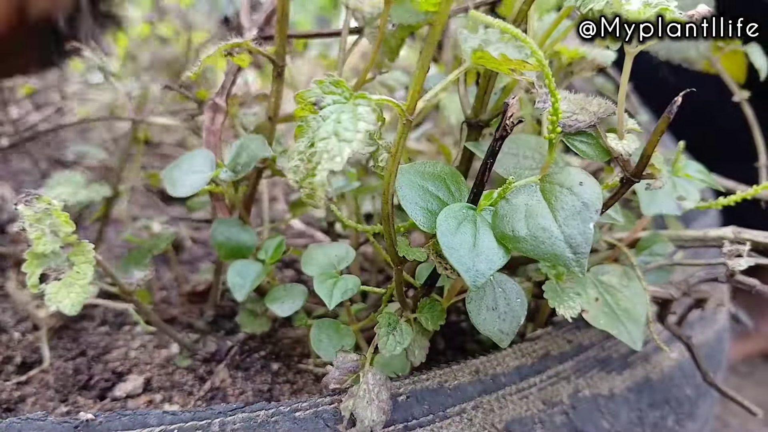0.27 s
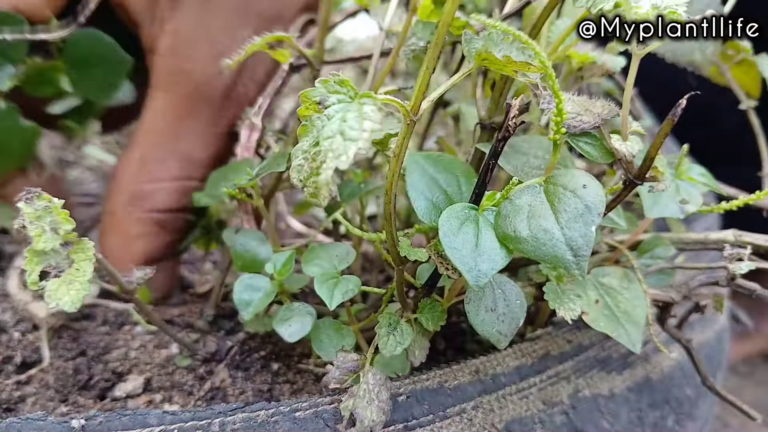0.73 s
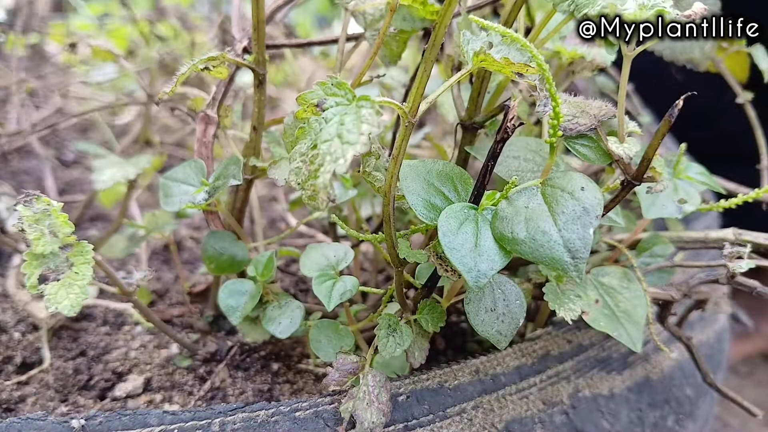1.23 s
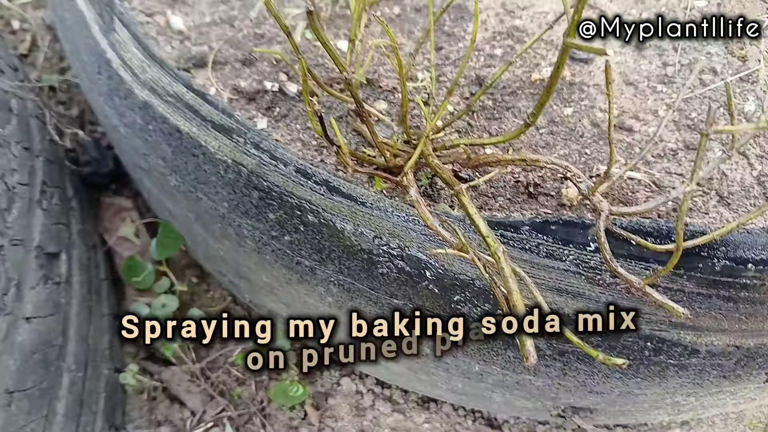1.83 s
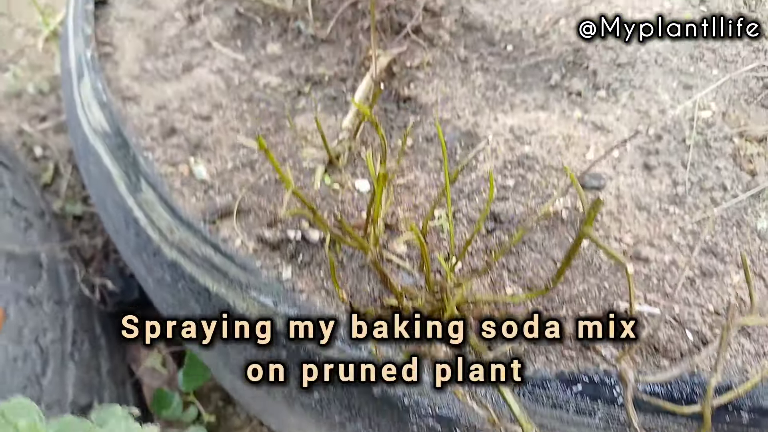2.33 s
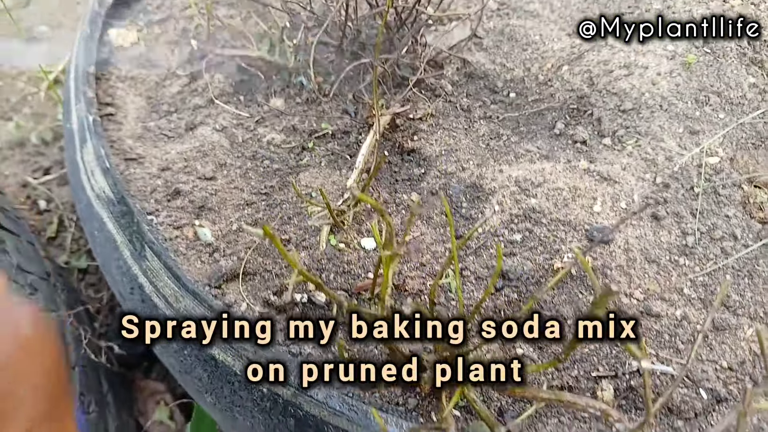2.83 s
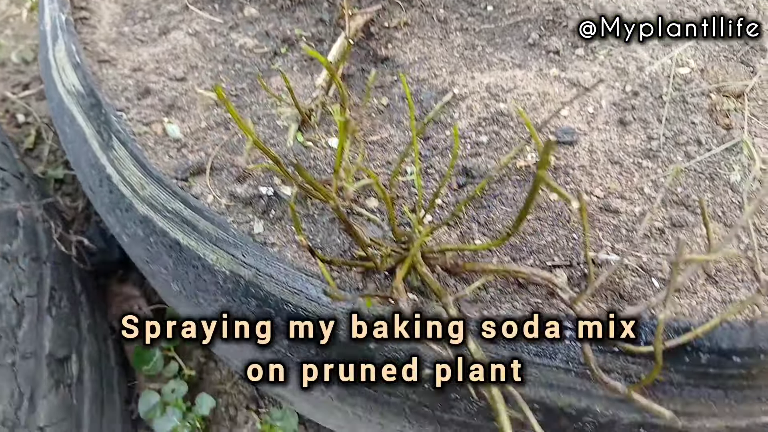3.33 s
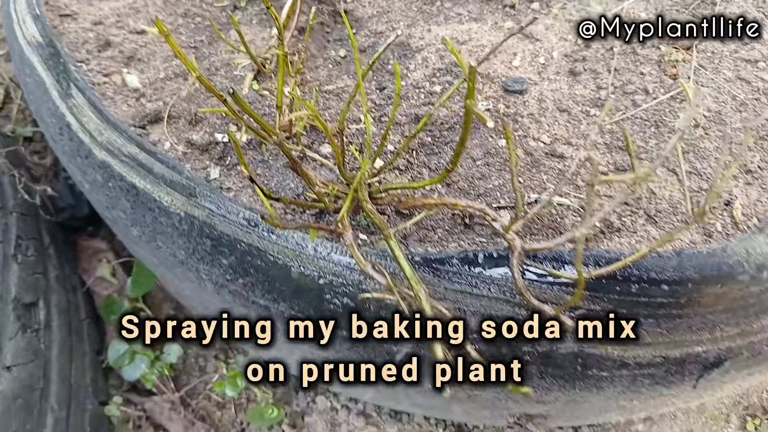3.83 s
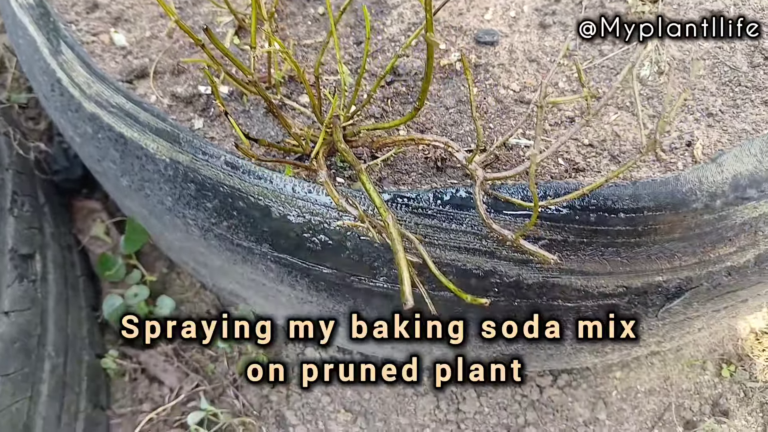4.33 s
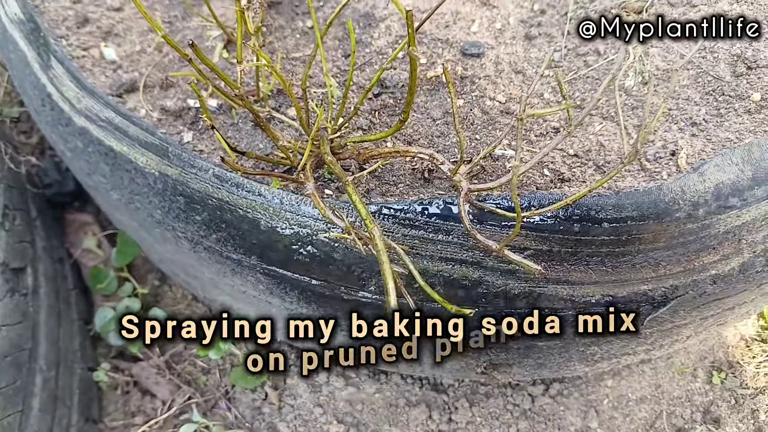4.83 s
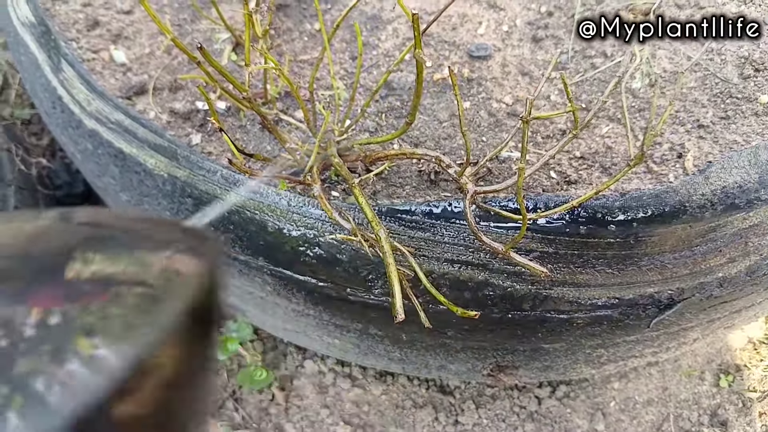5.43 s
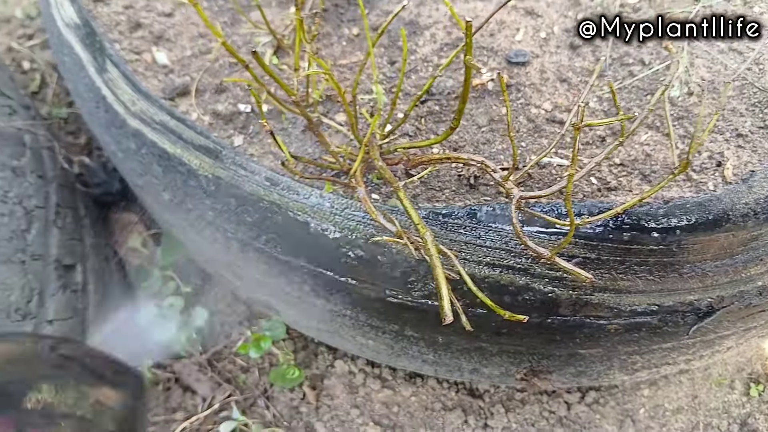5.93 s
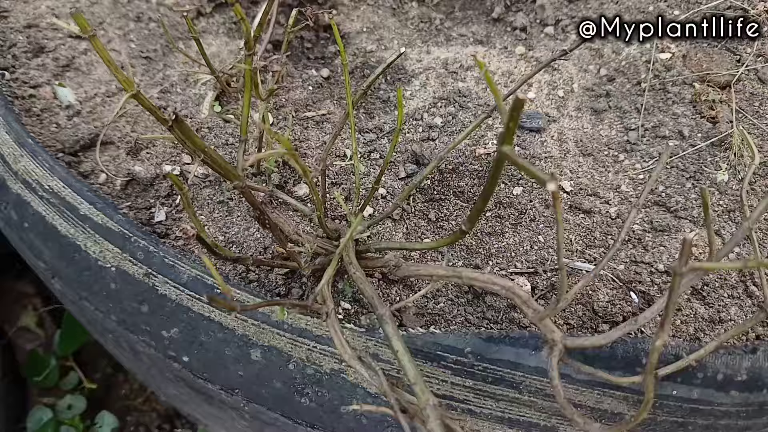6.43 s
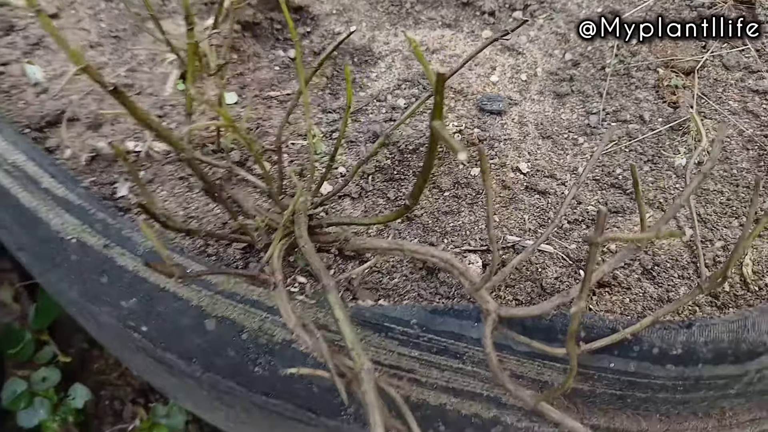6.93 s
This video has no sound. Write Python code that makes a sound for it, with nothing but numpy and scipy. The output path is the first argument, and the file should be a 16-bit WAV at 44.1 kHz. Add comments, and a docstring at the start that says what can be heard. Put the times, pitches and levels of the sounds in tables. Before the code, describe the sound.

A close trigger sprayer squirts quickly and steadily for several seconds, following a soft brush of leaves and tiny stem cracks. Hard plastic clicks stand out around each brief puff of mist. Midway, low gusts of outdoor wind buffet the right side of the microphone, with a faint hiss and drone far behind. After the last snap comes a short scrape and a low handling thump on the left.

```python
"""Small plants rustle under a hand, outdoors, close to a stereo microphone; then a trigger spray bottle
is pumped again and again. Each squeeze opens the valve with a spit and swells into a hiss of mist;
the plastic trigger snaps on the way in and out. Wind rumbles on the microphone over a far hiss and
a low drone, and at the end a finger scrapes and bumps the left port."""
import sys
import numpy as np
from scipy import signal
from scipy.fft import rfft, irfft, next_fast_len
from scipy.io import wavfile
from scipy.ndimage import uniform_filter1d, map_coordinates

SR = 44100
rng = np.random.default_rng(int(sys.argv[2]) if len(sys.argv) > 2 else 0)


def wav_record(signal):
    """Record a signal, one row per channel, as 16-bit PCM in the file named by sys.argv[1]."""
    frames = np.transpose(np.atleast_2d(signal))
    bounded = np.clip(frames, -1, 1)
    # unit amplitude maps onto the largest positive 16-bit level
    quanta = np.round(bounded * 32767).astype(np.int16)
    wavfile.write(sys.argv[1], SR, quanta)


N = 317079
TIME = np.arange(N) / SR

# Modes of trigger and bottle, the wall first. Each row: pitch in Hz, width in Hz, relative level in dB.
PLASTIC_MODES = [(975, 108, 2), (605, 900, -21), (1360, 366, -3.5), (1717, 650, 0), (2264, 797, -1.5),
                 (2770, 340, -3.5), (3240, 496, -4.5), (4080, 127, -2), (4650, 264, -8.5), (5600, 300, -15),
                 (11100, 1300, -29)]


def from_db(db):
    """Decibels to gain."""
    return 10 ** (np.asarray(db) / 20)


def unit_rms(x):
    """Scale to rms 1."""
    return x / np.sqrt(np.mean(x ** 2) + 1e-20)


def curves_at(rows, s=TIME):
    """The columns of a timed table, read off at s seconds."""
    times, *columns = np.transpose(rows)
    return [np.interp(s, times, column) for column in columns]


def swell(t, length_s, squareness=2):
    """A rounded hump about t = 0, above half height for length_s."""
    return .5 ** np.minimum(np.abs(2 * t / length_s) ** squareness, 40)


def humps(rows):
    """Gain from rounded swells. Each row: centre in seconds, length in seconds, level in dB."""
    return sum(from_db(db) * swell(TIME - s, length_s) for s, length_s, db in rows)


def flutter(per_s):
    """A random wander with rms 1."""
    knots = rng.standard_normal(4096)
    return unit_rms(np.interp(TIME * per_s, np.arange(len(knots)), knots))


def pan(db):
    """Gains of constant power, the left db above the right."""
    gains = from_db(np.array([[db], [-db]]) / 2)
    return gains / np.sqrt(np.mean(gains ** 2, axis=0))


def delay(x, s):
    """The same sound, s seconds later."""
    return map_coordinates(x, [np.arange(len(x)) - s * SR], order=3)


def add(out, s, sound):
    """Mix a stereo sound in at time s."""
    at = max(int(s * SR), 0)
    out[:, at:at + sound.shape[-1]] += sound[..., :N - at]


def cut(x, hz, kind, order=2):
    """Butterworth low- or high-pass."""
    return signal.sosfilt(signal.butter(order, hz, kind, fs=SR, output="sos"), x)


def resonance(x, hz, width_hz):
    """Two-pole resonance with gain 1 at its peak."""
    r = np.exp(-np.pi * width_hz / SR)
    feedback = [1, -2 * r * np.cos(2 * np.pi * hz / SR), r * r]
    return signal.lfilter(np.array([1, 0, -1]) * (1 - r * r) / 2, feedback, x + 1e-18)


def colour(x, spectrum):
    """Give a flat sound a spectrum; rms 1."""
    hz, db = np.transpose(spectrum)
    size = next_fast_len(N)
    bins = np.maximum(np.fft.rfftfreq(size, 1 / SR), 1)
    gain = from_db(np.interp(np.log(bins), np.log(hz), db)) * np.minimum(bins / hz[0], 1) ** 2
    return unit_rms(irfft(rfft(x, size) * gain, size)[..., :N])


def grains(per_s, spread_db):
    """Tiny impacts at random times and of uneven size; rms 1."""
    sizes = from_db(spread_db * np.minimum(rng.exponential(1, N), 4)) * rng.choice([-1, 1], N)
    return unit_rms(sizes * (rng.random(N) < per_s / SR))


def grain_cloud(per_s, spread_db, alike, lag_s):
    """Grains in stereo: the shared part reaches the right port lag_s after the left."""
    shared, left, right = [grains(per_s, spread_db) for _ in range(3)]
    common = np.array([shared, delay(shared, lag_s)])
    return np.sqrt(alike) * common + np.sqrt(1 - alike) * np.array([left, right])


def drone(hz=76, width_hz=7):
    """A narrow, wavering low tone, far off behind the wind."""
    # The drone's rise and fall. Each row: time in seconds, level in dB.
    levels = [(0, -81), (1.7, -66), (2.1, -55), (3.3, -58), (4.5, -57), (6.2, -54), (6.8, -49.5),
              (7.19, -64)]
    level_db, = curves_at(levels)
    noise = grain_cloud(per_s=28000, spread_db=0, alike=0.39, lag_s=0)
    return from_db(level_db) * unit_rms(resonance(resonance(noise, hz, width_hz), hz, width_hz))


def far_air(gain_db=7.5, side_db=-4):
    """The smooth hiss of the distance, a little to the right."""
    # Far outdoor noise. Each row: time in seconds, relative level in dB.
    levels = [(0, -72.5), (1.4, -73.5), (2.04, -65), (4.27, -65.5), (5.45, -68), (6.17, -65.5),
              (6.55, -68.5), (7.19, -65.5)]
    # Its spectrum. Each row: frequency in Hz, relative density in dB.
    spectrum = [(71, -40), (120, -6.5), (170, -10.5), (289, -16.5), (483, -25), (557, -22.5), (1010, -26),
                (1460, -23.5), (1860, -27.5), (2870, -28), (6770, -39), (9790, -34), (16000, -32.5)]
    level_db, = curves_at(levels)
    return from_db(level_db + gain_db) * pan(side_db) * colour(rng.standard_normal((2, N)), spectrum)


def port(pressure, low_hz=50, ring_hz=76, ring_width_hz=16, ring_db=7):
    """Air pushed into a microphone port loses its deepest part and booms just above that edge."""
    passed = cut(pressure, low_hz, "high", order=4)
    return passed + from_db(ring_db) * resonance(passed, ring_hz, ring_width_hz)


def wind(boom_top_hz=110, flap_top_hz=170):
    """Right on the microphone, a breeze plays on both ports, and puffs of air from the spray and the moving
    hand buffet the right one."""
    # Wind pressure. Each row: frequency in Hz, relative density in dB.
    spectrum = [(25, 8), (50, 7), (80, 4.5), (120, 0.5), (180, -19.5), (300, -28.5), (600, -80)]
    # The steady breeze. Each row: time in seconds, left level in dB, right level in dB.
    breeze_levels = [(0, -57.5, -54), (.5, -70.5, -59.5), (1.5, -69, -60.5), (2.1, -56, -55),
                     (3.3, -51.5, -51.5), (3.9, -75, -43.5), (5.6, -58, -47.5), (6.15, -66, -53),
                     (6.85, -52, -50), (6.95, -59, -69)]
    # Puffs of air on the right port. Each row: centre in seconds, length in seconds, boom in dB, flapping above
    # it in dB.
    gusts = [(3.469, 0.068, -28.5, -43), (3.674, 0.037, -40, -55), (3.815, 0.046, -37.5, -43.5),
             (3.929, 0.074, -27, -38.5), (4.016, 0.068, -30, -47.5), (4.226, 0.089, -31, -46.5),
             (4.482, 0.074, -48, -58), (4.674, 0.064, -39.5, -55), (4.912, 0.23, -47, -58),
             (5.12, 0.036, -38, -59), (5.331, 0.063, -30, -55), (5.697, .08, -39.5, -56)]
    rumble = unit_rms(port(colour(rng.standard_normal((2, N)), spectrum)))
    rumble /= np.sqrt(uniform_filter1d(rumble ** 2, SR // 12) + 0.008)   # eddies of even strength
    breeze = from_db(curves_at(breeze_levels)) * rumble
    big_eddies = unit_rms(cut(rumble[1], boom_top_hz, "low"))
    above_boom = cut(rng.standard_normal(N), boom_top_hz, "high")
    small_eddies = unit_rms(cut(above_boom, flap_top_hz, "low", order=4))
    boom = humps([(s, length_s, db) for s, length_s, db, _ in gusts]) * big_eddies
    flapping = humps([(s, length_s, db) for s, length_s, _, db in gusts]) * small_eddies
    return breeze + (boom + flapping) * np.array([[0], [1]])


def finger(rub_s=6.988, rub_db=-33.5, bump_s=6.964, bump_db=-9, leak_s=.014):
    """Skin sticks and slips over the left port and shuts it with a step of pressure that leaks away."""
    # The skin catches. Each row: centre in seconds, relative level in dB, length in seconds.
    catches = [(6.927, -18, 0.0027), (6.9305, -18, 0.0014), (6.9386, -13, 0.00067), (6.944, -20, 0.015),
               (6.962, -18, 0.0036), (6.987, -30, .005), (7.003, -18.5, 0.005)]
    # Skin scraping on the port. Each row: frequency in Hz, relative density in dB.
    spectrum = [(180, -41), (300, -10), (546, -10.5), (1030, -12), (1150, -13), (1280, -12.5), (1460, -10),
                (2740, -12.5), (3350, -9.5), (7080, -13), (10600, -2), (16000, -7)]
    grip = from_db(rub_db) * swell(TIME - rub_s, length_s=0.089)
    grip += humps([(s, length_s, db) for s, db, length_s in catches])
    scrape = grip * colour(grain_cloud(per_s=9000, spread_db=8, alike=0.026, lag_s=0.00036), spectrum)
    step = (TIME > bump_s) * np.exp(-np.abs(TIME - bump_s) / leak_s)
    bump = port(cut(step + 1e-18, 2200, "low"), low_hz=56, ring_hz=78, ring_width_hz=17, ring_db=12.5)
    bump *= from_db(bump_db) / np.abs(bump).max()
    return scrape * from_db([[-0.5], [-17.5]]) + bump * from_db([[0], [-28]])   # faint on the right


def plants(stir_db=-66.5, stir_end_s=2.2, crack_gain_db=-4.5, crack_s=0.0014, stem_hz=6500):
    """Close by, leaves brush past the hand in clumps of grains; now and then a stem cracks and rings."""
    # The hand brushes leaves. Each row: centre in seconds, length in seconds, level in dB.
    brushes = [(.04, 0.13, -48.5), (.61, .1, -58.5), (.8, 0.036, -56.5), (.93, 0.045, -59),
               (1.05, 0.023, -57.5), (1.31, 0.03, -58.5), (1.49, 0.065, -47), (1.58, .03, -51.5),
               (1.745, 0.052, -51.5)]
    # Rustling leaves. Each row: frequency in Hz, relative density in dB.
    spectrum = [(180, -24), (300, 2.5), (961, -22), (1140, -26), (1460, -5.5), (1640, -13), (3580, -10),
                (8640, -2), (16000, 1)]
    # Stems and leaves crack under the hand or a big drop.
    # Each row: start in seconds, relative level in dB, ring in Hz.
    cracks = [(.2572, -29.5, 3930), (.474, -37.5, 7100), (1.042, -30, 8100), (1.3018, -38, 8600),
              (1.4262, -42, 6500), (1.57, -30.5, 8300), (1.8092, -31, 8700), (1.876, -32, 8500),
              (1.977, -24, 8100), (2.599, -31.5, 6000), (3.7489, -27, 8050), (3.7794, -26, 7200),
              (4.2264, -26.5, 8500), (4.936, -24.5, 8600), (6.214, -33, 9700), (6.228, -32, 9500)]
    level = humps(brushes) + from_db(stir_db) * (TIME < stir_end_s)   # stirring until the hand leaves
    touches = grain_cloud(per_s=1800, spread_db=4, alike=0.1, lag_s=0.00033)
    out = level * colour(touches * from_db(2 * flutter(130)), spectrum)
    dense = grain_cloud(per_s=25000, spread_db=1, alike=.3, lag_s=.0003)
    crisp = cut(colour(dense, spectrum), 3400, "high", order=4)
    # fourteen small cracks come by chance, more often where the hand brushes harder
    chance = np.cumsum(np.sqrt(level[::64]))
    small_cracks = []
    for when, size, thinness in rng.random((14, 3)):
        s = np.interp(when, chance / chance[-1], TIME[::64])
        small_cracks.append((s, -39.5 + 6 * (size - .5), stem_hz * 2 ** (thinness - .5)))
    for s, db, hz in list(cracks) + small_cracks:
        crack = crisp[:, int(s * SR):][:, :1024] * np.exp(-TIME[:1024] / crack_s)
        ring_db = 7 - 2.5 * np.log2(hz / stem_hz)   # thin stems ring higher and more faintly
        crack += from_db(ring_db) * resonance(crack, hz, width_hz=400)
        add(out, s, from_db(db + crack_gain_db) * crack / np.abs(crack.mean(axis=0)).max())
    return out


def seal(lag_s=0.00051):
    """The piston's seal rubs in brief, wavering squeaks while it is still dry."""
    # Squeaks. Each row: centre in seconds, length in seconds, pitch in Hz, level in dB.
    squeaks = [(1.877, 0.002, 1643, -29.5), (1.985, 0.018, 2125, -43.5), (2.274, 0.024, 2310, -37.5),
               (2.543, 0.038, 2335, -49.5)]
    out = np.zeros(N)
    for s, length_s, hz, db in squeaks:
        rub = resonance(rng.standard_normal(N), hz, width_hz=70)
        even = rub / np.sqrt(uniform_filter1d(rub ** 2, size=256) + 1e-9)
        out += from_db(db) * swell(TIME - s, length_s) * even
    return np.array([out, delay(out, lag_s)])


def bottle_at(s):
    """Wall pitch, direction and brightness of the hand-held bottle at time s."""
    # Each row: time in seconds, wall pitch in Hz, relative lean left in dB, relative mist treble in dB.
    poses = [(1.902, 940, 1.5, -3.5), (3.0, 930, -0.5, -4), (3.55, 1003, -5, 0.5), (4.3, 1017, -12.5, -0.5),
             (5.1, 1008, -4, -2.5), (5.65, 1005, -5, -1.5), (6.1, 1040, -3.5, -1), (6.45, 1046, -5.5, 5)]
    return curves_at(poses, s)


def from_bottle(x, sway=(1, 1), lag_s=0.00029, bounce_s=0.001187):
    """The left port hears the bottle first; the right also gets a bright bounce off something close."""
    left = x + 0.05 * delay(x, 0.00096)
    bright = cut(x, 1500, "high")
    right = 0.8 * delay(x, lag_s * sway[0]) + 0.66 * delay(bright, bounce_s * sway[1])
    both = np.array([left, right])
    return both / np.sqrt(np.sum(both ** 2) / (SR / 800))   # height about 1


def plastic_ring(pitch_hz, wall_db, treble_db, uneven_db=1.5, treble_from_hz=3700):
    """One knock on the trigger rings every mode, each with a strength of its own."""
    knock = signal.unit_impulse(2048)
    _, wall_width_hz, wall_mode_db = PLASTIC_MODES[0]
    ring = from_db(wall_mode_db + wall_db) * resonance(knock, pitch_hz, wall_width_hz)
    for k, (hz, width_hz, db) in enumerate(PLASTIC_MODES[1:]):
        db = db + uneven_db * rng.normal() + treble_db * (hz > treble_from_hz)
        ring += (-1) ** k * from_db(db) * resonance(knock, hz * (1 + .01 * rng.normal()), width_hz)
    contact = from_db(treble_db - 14) * resonance(knock, hz=3200, width_hz=2200)
    return ring + contact


def snap(s, treble_db, wall_db, lean_db, shift_hz=0):
    """One hard knock of the trigger, from where the bottle is at time s."""
    pitch_hz, side_db, _ = bottle_at(s)
    ring = plastic_ring(pitch_hz + shift_hz, wall_db, treble_db)
    sway = rng.uniform(.86, 1.14, 2)   # the bottle sways, so both paths change from snap to snap
    return pan(side_db + lean_db) * from_bottle(ring, sway)


def trigger(contact_s=.0009, piston_lead_s=.031, tick_gain_db=-1, drag_s=0.0035):
    """Hard snaps of the trigger on the way in and out, and the softer ticks of the piston."""
    # The trigger catches going in. Each row: time in seconds, level in dB, treble share in dB.
    presses = [(1.877, -39, 6), (2.04, -16, 1.5), (2.061, -29.5, -1), (2.273, -26, -5), (2.306, -23, -3),
               (2.552, -18.5, -0.5), (3.061, -24, -2), (3.093, -19, 0), (3.402, -21, -10),
               (3.451, -18, -12), (3.721, -14.5, -9.5), (4.245, -18, -3.5), (4.609, -11.5, -23),
               (5.005, -11, -23), (5.296, -18, -4), (5.354, -14.5, -20), (5.601, -21.5, 1),
               (5.634, -20, -4), (5.939, -14.5, -4), (6.141, -25.5, -2), (6.217, -28, -1),
               (6.232, -23.5, -3), (6.305, -15, -2)]
    # It snaps back. Each row: time in seconds, level in dB, treble share in dB.
    releases = [(1.909, -18, 1.5), (2.185, -18, 0), (2.462, -19.5, -1), (2.97, -14.5, -0.5),
                (3.263, -14, 0), (3.583, -12.5, -2), (4.141, -14.5, -1.5), (4.408, -15.5, 0),
                (4.777, -12.5, -3.5), (5.147, -12.5, -2.5), (5.495, -14, -2.5), (5.797, -16, -1.5),
                (6.104, -17, 1.5), (6.446, -16, -3.5)]
    # Further piston ticks, at times of their own. Each row: start in seconds, relative level in dB.
    further_ticks = [(1.955, -34.5), (2.668, -36.5), (3.832, -30.5), (4.09, -28), (6.204, -35), (6.66, -42.5),
                     (7.117, -38.5), (7.177, -33)]
    out = np.zeros((2, N))
    for s, db, treble_db in presses:   # under load the wall rings louder and lower
        add(out, s + contact_s, from_db(db) * snap(s, treble_db, wall_db=4, lean_db=6.5, shift_hz=-40))
    for s, db, treble_db in releases:
        add(out, s + contact_s, from_db(db) * snap(s, treble_db, wall_db=0, lean_db=3))
    release_ticks = [(s - piston_lead_s, -36.5) for s, _, _ in releases]
    for s, db in release_ticks + list(further_ticks):
        # the piston drags for a few milliseconds, muffled inside the pump
        drag = rng.standard_normal(512) * np.exp(-TIME[:512] / drag_s)
        ring = plastic_ring(PLASTIC_MODES[0][0], wall_db=11.5, treble_db=-6)
        tick = resonance(np.convolve(ring, drag), hz=2000, width_hz=590)
        add(out, s, from_db(db + tick_gain_db) * from_bottle(tick))
    return out


def droplets(spectrum, per_s, spread_db, sputter_db, split_hz=2500, lag_s=0.00023):
    """Sputtering jet noise; the two ports agree in the lows and less in the highs."""
    low = cut(grain_cloud(per_s, spread_db, alike=0.6, lag_s=lag_s), split_hz, "low")
    high = cut(grain_cloud(per_s, spread_db, alike=0.028, lag_s=lag_s), split_hz, "high")
    return colour((low + high) * from_db(sputter_db * flutter(220)), spectrum)


def spray(shortest_jet_s=0.046, spit_s=0.029, crack_s=0.0056, crack_db=6, valve_gain_db=6, side_db=1):
    """Near the microphone the valve cracks open and spits; the mist then follows the pump's pressure."""
    # Squeezes. Each row: start in seconds, seconds to peak pressure, relative mist and valve levels in dB.
    squeezes = [(1.8, 0.004, -46, -62), (1.972, 0.071, -39.5, -44.5), (2.254, .06, -43.5, -49.5),
                (2.512, 0.054, -47, -48.5), (2.759, 0.056, -49, -52.5), (3.049, 0.067, -38.5, -49.5),
                (3.37, 0.09, -42, -47), (3.667, 0.071, -42.5, -49), (3.922, 0.066, -43.5, -50),
                (4.213, 0.062, -43.5, -48.5), (4.535, 0.086, -35, -44.5), (4.919, 0.085, -36.5, -49.5),
                (5.271, 0.081, -42, -48), (5.583, 0.078, -43.5, -50), (5.887, .079, -43.5, -48.5),
                (6.212, .081, -47.5, -46)]
    # The hiss of the mist. Each row: frequency in Hz, relative density in dB.
    mist_spectrum = [(150, -41), (250, -4.5), (566, -0.5), (955, 5), (1260, -6), (1470, 3.5), (1580, 0),
                     (2240, -6.5), (3840, -7), (6700, -17.5), (8400, -14.5), (11100, -14.5), (12800, -15),
                     (15200, -15.5), (16000, -52)]
    # The spit of the valve. Each row: frequency in Hz, relative density in dB.
    valve_spectrum = [(290, -26), (500, -13), (761, -9), (1050, 4.5), (1500, 7), (2070, 7), (2400, 4.5),
                      (2770, -3), (7640, -14.5), (8330, -7), (12100, -9.5), (16000, -13)]
    mist = droplets(mist_spectrum, per_s=15000, spread_db=0, sputter_db=2.02)
    spit = droplets(valve_spectrum, per_s=4400, spread_db=4.5, sputter_db=1)
    fine_mist = cut(mist, 5500, "high", order=1)
    crack = from_db(crack_db) * cut(spit, 6000, "high")
    out, t = np.zeros((2, N)), TIME[:SR // 4]
    opening = 1 - np.exp(-t / 0.00068)
    for s, peak_s, mist_db, valve_db in squeezes:
        span = slice(int(s * SR), int(s * SR) + len(t))
        length_s = shortest_jet_s + 0.43 * peak_s   # a slower squeeze sprays longer
        pressure = swell(t - peak_s, length_s, squareness=2.33) * (1 - np.exp(-t / 0.0057))
        _, _, treble_db = bottle_at(s)
        hiss = mist[:, span] + (from_db(treble_db + 11) - 1) * fine_mist[:, span]
        # each jet sweeps over the plant and changes colour on its way
        for hz in rng.uniform([700, 2000, 8000], [1700, 6000, 14000]):
            tint_db = np.interp(t, peak_s + length_s * np.array([-.5, 0, .5]), 3 * rng.standard_normal(3))
            hiss += (from_db(tint_db) - 1) * resonance(hiss, hz, .2 * hz)
        jet = from_db(mist_db) * pressure * hiss
        burst = spit[:, span] * np.exp(-(t / spit_s) ** 2) + crack[:, span] * np.exp(-t / crack_s)
        valve = from_db(valve_db + valve_gain_db) * opening * burst
        add(out, s, pan(side_db) * (jet + valve))
    return out


def yard(x, wet_db=-31, t60_s=.16, dull_hz=3500, wall_s=0.16, wall_db=-39):
    """Faint scatter from ground and plants, and one echo from a far wall."""
    t = TIME[:SR // 2]
    tail = cut(rng.standard_normal((2, len(t))), dull_hz, "low") * from_db(-60 * t / t60_s)
    tail = from_db(wet_db) * tail / np.sqrt(np.sum(tail ** 2) / 2)
    tail[:, int(wall_s * SR)] += from_db(wall_db)
    return x + signal.fftconvolve(x, tail, axes=1)[:, :N]


def scene():
    """Bottle and plants in the yard, drone and hiss far off, wind and finger on the microphone."""
    return yard(trigger() + seal() + spray() + plants()) + drone() + wind() + far_air() + finger()


def record(dry, ceiling=0.55, dropout_s=(6.452, 6.464), cutoff_hz=16100):
    """Peaks are rounded, the sound drops out for an instant after the last snap, and the top is cut."""
    live = uniform_filter1d(1. * ((TIME < dropout_s[0]) | (TIME > dropout_s[1])), size=64)
    rounded = dry / (1 + (dry / ceiling) ** 4) ** .25
    return signal.sosfilt(signal.ellip(10, .2, 80, cutoff_hz, fs=SR, output="sos"), rounded * live)


dry = scene()
out = record(dry)
wav_record(out)
```